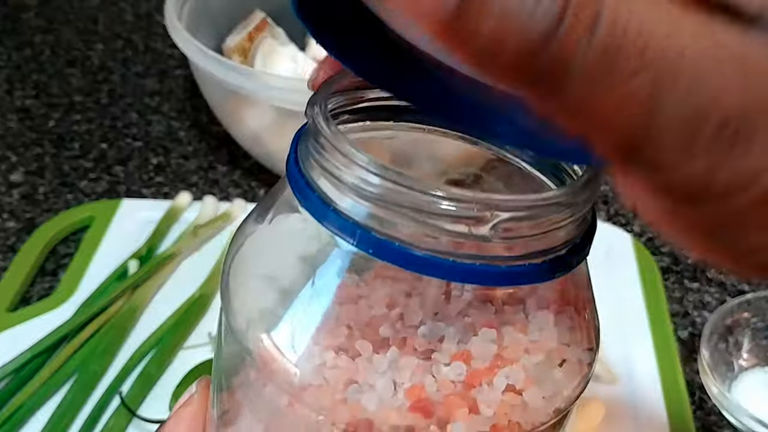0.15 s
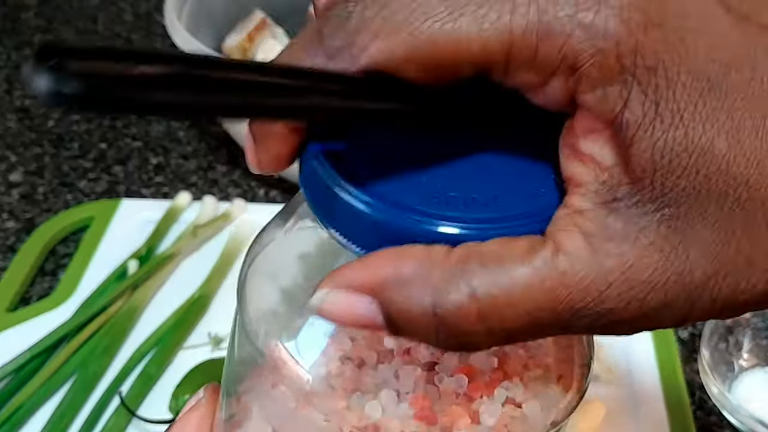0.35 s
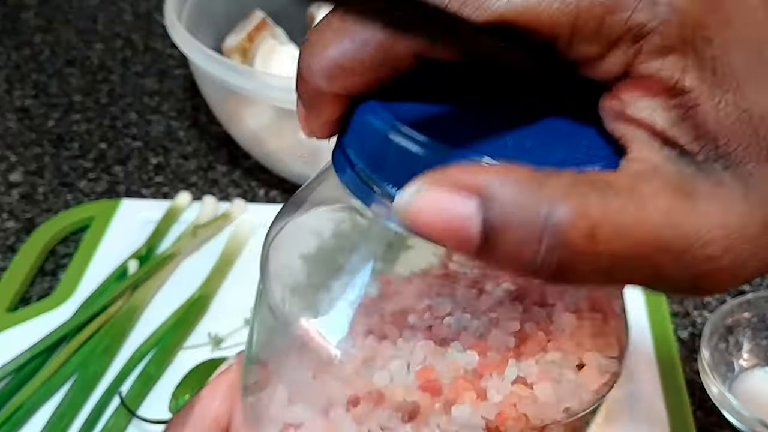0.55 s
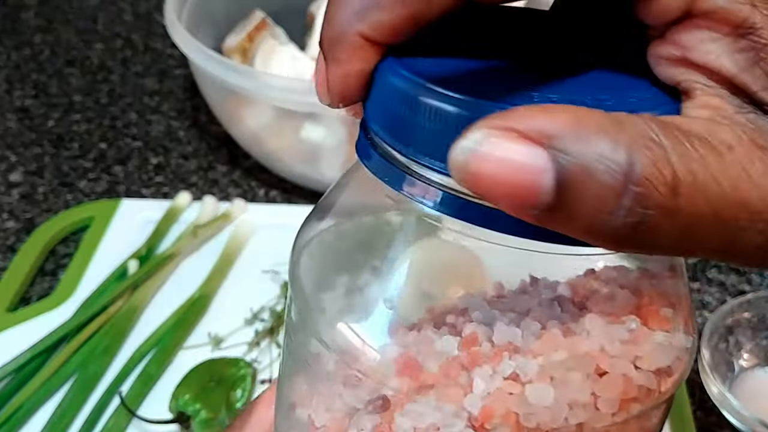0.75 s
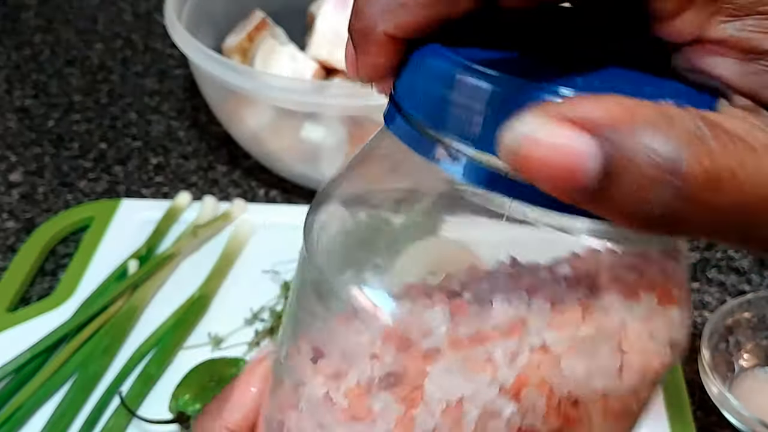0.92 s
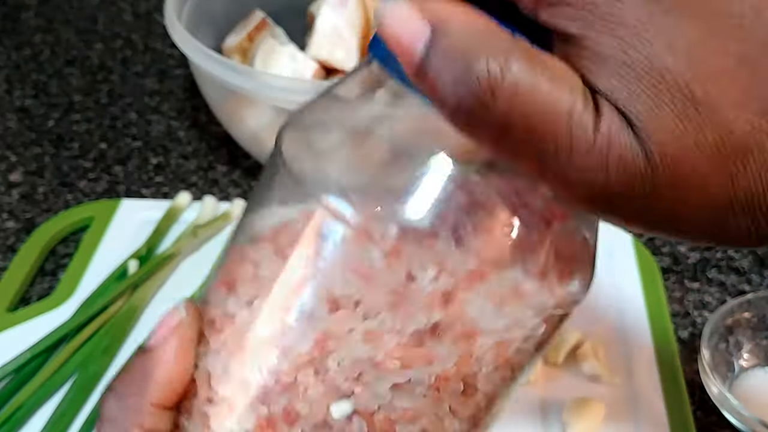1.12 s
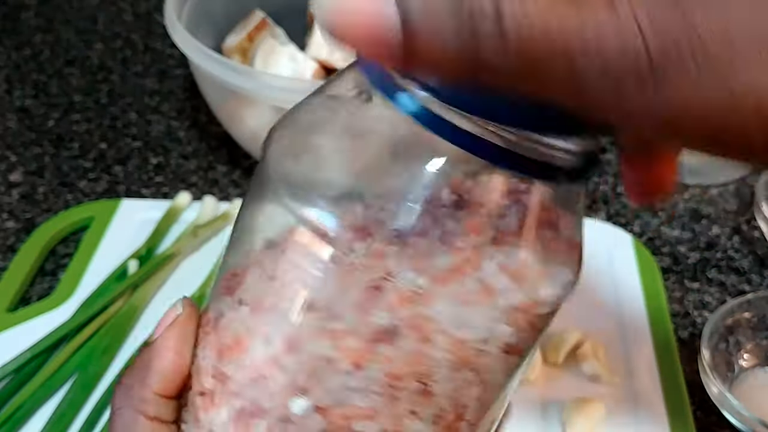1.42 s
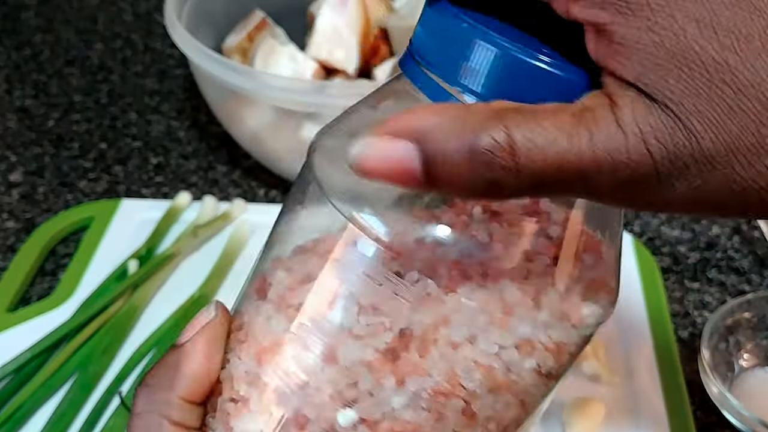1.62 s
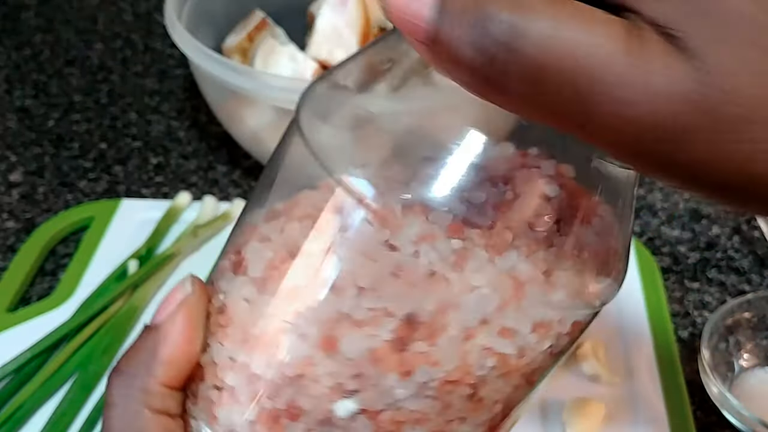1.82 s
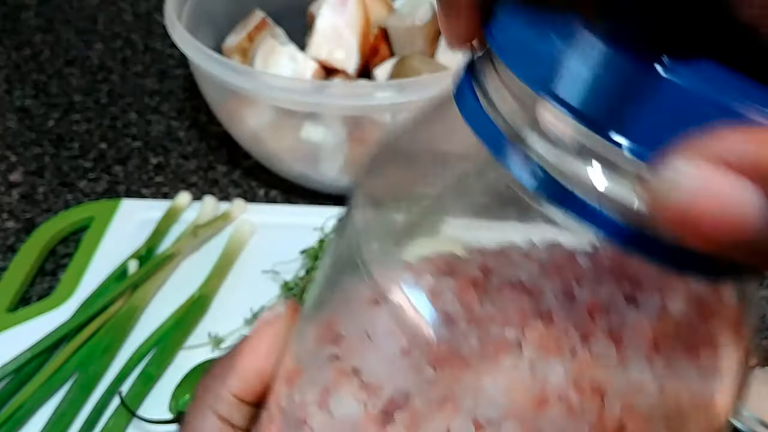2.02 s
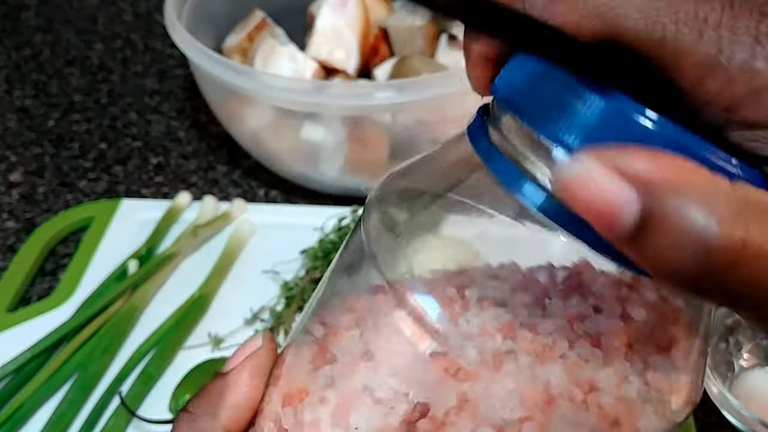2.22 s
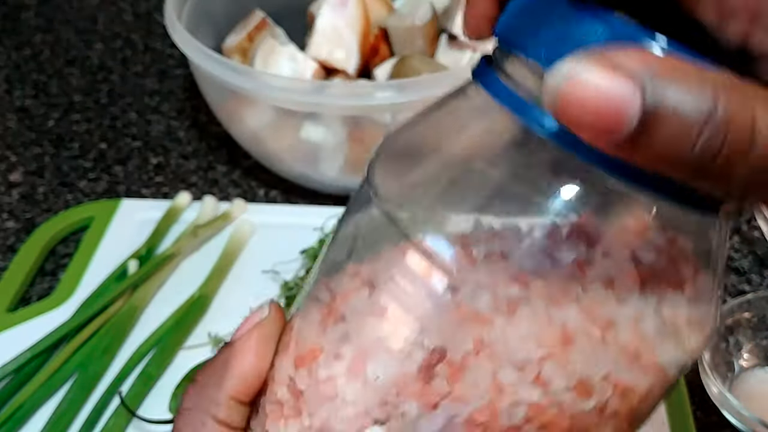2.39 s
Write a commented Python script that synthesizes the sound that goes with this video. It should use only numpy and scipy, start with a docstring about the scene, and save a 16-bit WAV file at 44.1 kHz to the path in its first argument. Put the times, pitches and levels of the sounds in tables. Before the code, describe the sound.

A plastic lid is screwed onto a glass jar of coarse salt. Hollow taps sink in pitch, then the lid knocks and snaps over the thread while crystals slide and rattle, close up in a softly humming kitchen.

```python
"""A plastic lid is screwed onto a glass jar of coarse salt, knocking and snapping over the thread.
As the lid covers the mouth, the air in the jar rings hollow and sinks in pitch.
Crystals slide and rattle as the jar tilts; light contacts clink the glass wall.
The jar is close to the microphone in a small kitchen that hums underneath."""
import sys
import numpy as np
from scipy import signal
from scipy.fft import rfft, irfft, next_fast_len
from scipy.io import wavfile
from scipy.ndimage import map_coordinates

SR = 44100
rng = np.random.default_rng(int(sys.argv[2]) if len(sys.argv) > 2 else 0)


def digitize_waveform(pressure):
    """Quantize a signal to 16-bit integers and store it at the path in sys.argv[1].

    Rows of a 2-D input are taken as channels; values are limited to [-1, 1].
    """
    field = np.atleast_2d(pressure).T
    bounded = np.clip(field, -1, 1)
    quanta = np.round(bounded * 32767).astype(np.int16)
    wavfile.write(sys.argv[1], SR, quanta)


N = 112454


def amp(db):
    """Decibels to gain."""
    return 10 ** (np.asarray(db) / 20)


def unit(x):
    """Scale to rms 1."""
    return x / np.sqrt(np.mean(x ** 2) + 1e-20)


def curve_at(points, hz):
    """Interpolate (f/Hz, value) points on a log axis."""
    point_hz, values = np.transpose(points)
    return np.interp(np.log(hz + 1), np.log(point_hz + 1), values)


def add(track, start_s, x):
    """Mix x into the track."""
    i = max(0, round(start_s * SR))
    track[..., i:i + x.shape[-1]] += x[..., :max(0, track.shape[-1] - i)]


def fade(t, t60_s):
    """Exponential decay."""
    return np.exp(-np.log(1000) * t / t60_s)


def rise(t, tau_s):
    """Exponential attack."""
    return 1 - np.exp(-t / tau_s)


def coloured(x, db_of_hz):
    """Minimum-phase filter with the given gain curve."""
    n = x.shape[-1]
    size = 2 * next_fast_len(n // 2 + 4096)
    cepstrum = irfft(np.log(amp(db_of_hz(np.fft.rfftfreq(size, 1 / SR)))), size)
    cepstrum[..., 1:size // 2] *= 2
    cepstrum[..., size // 2 + 1:] = 0
    return irfft(rfft(x, size) * np.exp(rfft(cepstrum)), size)[..., :n]


def ring(modes, t, scatter_db=2, detune=0.008):
    """Decaying modes; each blow lands elsewhere and weights them anew."""
    out = np.zeros(len(t))
    for k, (hz, db, t60_s) in enumerate(modes):
        db += scatter_db * rng.standard_normal()
        hz *= 1 + detune * rng.standard_normal()
        out += (-1) ** k * amp(db) * fade(t, t60_s) * np.sin(2 * np.pi * hz * t)
    return out


# left-right likeness: f/Hz, correlation
STEREO_CORRELATION = [(40, 0.98), (120, 0.88), (300, 1), (650, 0.45), (1400, 0.095), (3000, 0), (8000, 0)]

def noise(spectrum, size):
    """Stereo noise of rms 1, alike in the bass, unrelated in the treble."""
    hz = np.fft.rfftfreq(size, 1 / SR)
    angle = np.arccos(np.clip(curve_at(STEREO_CORRELATION, hz), -1, 1)) / 2
    shaped = rfft(rng.standard_normal((2, size))) * amp(curve_at(spectrum, hz))
    mid, side = irfft(shaped * [np.cos(angle), np.sin(angle)], size)
    return unit(np.array([mid + side, mid - side]))


# room noise: f/Hz, level/dB
HUM_SPECTRUM = [(20, -35), (35, 8), (60, 0), (90, -4.5), (118, 3), (165, -7.5), (212, 2.5), (260, -8),
                (300, -1.5), (370, -16), (440, -6), (700, -20), (1200, -32), (3000, -40), (8000, -42.5),
                (16000, -39)]

def hum(level_db=-39, waver_db=1.5, wavers_per_s=10):
    """Low, slightly wavering kitchen noise."""
    waver = map_coordinates(rng.standard_normal(64), [np.arange(N) / SR * wavers_per_s])
    return amp(level_db + waver_db * waver) * noise(HUM_SPECTRUM, N)


# room decay: f/Hz, t60/s
REVERB_DECAY = [(100, 0.28), (300, 0.19), (700, 0.27), (2000, 0.25), (5000, 0.23), (8000, 0.19),
                (15000, 0.19)]
# reverb colour: f/Hz, level/dB
REVERB_EQ = [(60, -5), (300, -6), (700, -4), (2000, -5), (8000, -4.5), (16000, -2)]

def kitchen_reverb(x, onset_s=0.0017):
    """Short, bright kitchen reverberation, with a fresh random tail every 0.2 s."""
    out, size, block = np.zeros((2, N)), SR // 2, SR // 5
    onset = 1 - np.exp(-(np.arange(size) / SR / onset_s) ** 2)
    for i in range(0, N, block):
        white = noise([(20, 0), (20000, 0)], size)
        hz, t, bands = signal.stft(white, SR, nperseg=256)
        bands *= fade(t, curve_at(REVERB_DECAY, hz)[:, None])
        tail = signal.istft(bands, SR, nperseg=256)[1][:, :size]
        tail = unit(tail * onset) / np.sqrt(size)
        add(out, i / SR, signal.fftconvolve(x[:, i:i + block], tail, axes=1))
    return coloured(out, lambda hz: curve_at(REVERB_EQ, hz))


# crystal slides: t/s, length/s, level/dB, median f/Hz
SALT_SLIDES = [(.001, 0.025, -38.5, 11950), (.004, 0.0069, -38, 3040), (0.011, 0.033, -49, 4900),
               (0.066, 0.0027, -42.5, 5140), (0.102, 0.032, -52, 5530), (0.134, 0.042, -44.5, 4860),
               (0.339, .012, -40, 3100), (0.517, 0.089, -58.5, 6070), (0.572, 0.075, -47, 5340),
               (0.668, 0.0058, -35.5, 6600), (0.686, .04, -48.5, 5700), (0.729, 0.041, -38.5, 5500),
               (0.793, 0.066, -59, 5580), (0.833, 0.027, -34.5, 6020), (.89, 0.086, -47, 5880),
               (0.971, 0.054, -38.5, 4630), (1.037, 0.068, -33, 4820), (1.116, 0.054, -40.5, 4720),
               (1.159, .005, -35, 4800), (1.21, .09, -49, 4500), (1.335, 0.17, -44.5, 4280),
               (1.394, 0.0046, -31, 1700), (1.424, 0.021, -37, 1614), (1.449, 0.011, -36.5, 6440),
               (1.475, 0.0033, -28, 5560), (1.49, 0.07, -44.5, 2600), (1.5, 0.025, -26, 8850),
               (1.505, .003, -23.5, 6380), (1.516, 0.0033, -26.5, 6400), (1.53, .003, -29, 5900),
               (1.533, 0.0081, -26, 5800), (1.544, .045, -40.5, 5200), (1.6, .005, -37, 5960),
               (1.609, 0.086, -63, 2000), (1.694, 0.014, -45, 2400), (1.842, 0.0099, -42.5, 5400),
               (1.996, 0.024, -22, 6630), (2.022, 0.039, -37.5, 5400), (2.321, 0.044, -61, 6500),
               (2.475, .035, -36, 3790), (2.515, 0.021, -47, 4500)]
# rattle colour: f/Hz, level/dB
SALT_EQ = [(300, -11), (1500, -2), (3000, -0.5), (5500, 4), (8000, 3), (12000, 4), (16000, 5)]

def salt(grains_per_s=5500, log_pitch_spread=0.386, decay_cycles=2.9, settle_s=0.004):
    """Each slide is a shower of tiny crystal collisions, each at its own pitch."""
    out, t, size = np.zeros((2, N)), np.arange(SR // 200) / SR, SR // 4
    for start_s, length_s, db, median_hz in SALT_SLIDES:
        count = int(grains_per_s * length_s) + 4
        hit_s = rng.uniform(0, length_s, count) + rng.exponential(settle_s, count)
        hz = median_hz * np.exp(log_pitch_spread * rng.standard_normal((count, 1)))
        hz = np.clip(hz, 300, SR / 3)
        phases = rng.uniform(0, 2 * np.pi, (2, count, 1))
        grains = np.exp(-hz * t / decay_cycles) * np.sin(2 * np.pi * hz * t + phases)
        indices = ((hit_s * SR).astype(int)[:, None] + np.arange(len(t))).ravel()
        shower = np.array([np.bincount(indices, channel.ravel(), size)[:size] for channel in grains])
        duty = (length_s + settle_s) * SR / size
        add(out, start_s, amp(db) * unit(shower) * np.sqrt(duty))
    return coloured(out, lambda hz: curve_at(SALT_EQ, hz))


# glass contacts: t/s, level/dB
GLASS_CLINKS = [(1.275, -20.5), (1.334, -35), (1.345, -28.5), (1.373, -45), (1.397, -48.5), (1.432, -43)]
# glass wall: f/Hz, level/dB, t60/s
GLASS_MODES = [(2103, -5, 0.029), (2310, -3, 0.057), (2400, 2.5, 0.019), (3000, -11, 0.022),
               (4700, -8, 0.021)]
# hard contact, on glass or thread: f/Hz, level/dB
CRACK_SPECTRUM = [(500, -44), (2000, 0), (3500, 5), (5500, 3.5), (8000, -1), (16000, -7.5)]

def glass_clinks():
    """Light, hard contacts tick and ring the glass wall."""
    out, t = np.zeros((2, N)), np.arange(SR // 4) / SR
    for start_s, db in GLASS_CLINKS:
        tick = amp(-7.5) * noise(CRACK_SPECTRUM, len(t)) * fade(t, t60_s=0.01)
        wall = ring(GLASS_MODES, t) * rise(t, tau_s=0.00049)
        add(out, start_s, amp(db) * (wall + tick))
    return out


# lid pushes on the rim: t/s, level/dB, air t60/s, relative tick level/dB
RIM_TOUCHES = [(.136, -15, 0.048, -14), (.149, -19.5, 0.025, -14.5), (0.168, -30.5, 0.14, -15),
               (0.256, -15.5, 0.052, -19.5), (.279, -23.5, 0.21, -38), (.29, -25, 0.11, -31),
               (0.311, -15, 0.081, -27), (0.354, -8, 0.018, -23.5), (0.59, -19.5, 0.033, -27),
               (0.852, -17.5, 0.035, -25), (1.026, -22, .04, -36), (1.858, -11.5, .12, -12),
               (1.986, -14.5, .1, -25)]
# rim tick: f/Hz, level/dB
TICK_SPECTRUM = [(200, -13), (600, 4), (1200, 9), (2000, -2), (3200, 4), (4500, -8), (8000, -13.5),
                 (16000, -23)]
# air resonance: t/s, f/Hz
AIR_PITCH = [(0.138, 430), (0.202, 398.8), (.26, 342.4), (.3, 339), (.32, 291), (.345, 272.7), (.37, 305),
             (0.598, 280), (.85, 320), (1.799, 334)]

def jar_air():
    """The lid ticks on the rim and rings the air in the jar, lower as the gap closes."""
    envelope, ticks, t = np.zeros(N), np.zeros((2, N)), np.arange(SR // 4) / SR
    for start_s, db, t60_s, tick_db in RIM_TOUCHES:
        add(envelope, start_s, amp(db) * fade(t, t60_s) * rise(t, tau_s=0.0012))
        add(ticks, start_s, amp(db + tick_db) * noise(TICK_SPECTRUM, len(t)) * fade(t, t60_s=0.015))
    hz = np.interp(np.arange(N) / SR, *np.transpose(AIR_PITCH))
    return envelope * np.sin(2 * np.pi * np.cumsum(hz) / SR) + ticks


# knocks and thread snaps: t/s, level/dB, contact cut-off f/Hz, thump trim/dB, clack trim/dB,
# crack trim/dB
LID_KNOCKS = [(.098, -29, 594, -16, -28, -7.5), (.305, -18, 500, -27, -21, -17),
              (.313, -15, 506, -14.5, -18, -17.5), (.353, -19, 594, -12, -11, -4),
              (.360, -14, 595, -23, -31, -16), (.593, -16, 397, -19.5, -23.5, -34),
              (.849, -5.5, 430, -22, -24, -22), (1.0247, -2.5, 1190, -23.5, -11.5, -10.5),
              (1.032, -14.5, 910, -18, -23, -5.5), (1.062, -9.5, 900, -32, -10, -9.5),
              (1.171, -17.5, 910, -28, -12.5, -33), (1.182, -11, 617, -25, -15, -11),
              (1.186, -14.5, 497, -10.5, -14.5, -12.5), (1.331, -13.5, 740, -38, -17, -20.5),
              (1.350, -19, 770, -23, -20.5, -26.5), (1.372, -17, 1100, -1, -11, -22),
              (1.737, -11.5, 394.9, -11.5, -17, -29), (1.854, -10, 297, 0.5, -24, -32),
              (1.8576, -8, 400, -18, -7.5, -5), (1.860, -10, 800, -12, -7, -8.5),
              (1.984, 0.5, 660, -43, -16.5, -21.5), (1.988, -2, 1100, -30, -10, -13),
              (1.994, -6, 960, -20, -26, -8), (2.010, -11, 800, -36, -17.5, -14),
              (2.086, -11.5, 600, -27, -15.5, -14), (2.103, -21, 605, -2, -16, -12.5),
              (2.1667, -4, 1080, -31.5, -15, -22), (2.174, -16.5, 400, -12.5, -29, -26),
              (2.399, -24.5, 790, -13, -21.5, -46)]
# closed jar: f/Hz, level/dB, t60/s
JAR_MODES = [(174, -25, .06), (243.6, -6.5, 0.074), (319, -9.5, 0.059), (333.4, -6, 0.15),
             (434, -2.5, 0.042), (499, -6, 0.065), (599.6, -10.5, 0.077), (717, -6.5, 0.059),
             (896, -10, 0.027), (1050, -19.5, 0.014)]
# plastic lid: f/Hz, level/dB, t60/s
LID_MODES = [(1044, -6.5, 0.046), (1206, -13, 0.027), (1430, -14.5, 0.049), (1559, -5.5, 0.029),
             (1788, -9, 0.053), (2124, -10, 0.065), (2340, -11.5, 0.025), (2460, -11.5, 0.041),
             (2640, -14, 0.085), (3200, -27, .04)]
# lid impact noise: f/Hz, level/dB
CLACK_SPECTRUM = [(200, -19), (500, 1), (1000, 7.5), (1400, -3), (2400, 3), (3500, -6.5), (6000, -65.5),
                  (16000, -39)]

def lid_knocks(push_s=0.00056, thump_hz=107):
    """Each slip pushes the air, thumps the held jar, rings jar and lid and cracks on the thread."""
    out, t = np.zeros((2, N)), np.arange(SR // 4) / SR
    u = t / push_s
    push = amp(-3) * np.e * u * (2 - u) * np.exp(-u)
    thump = amp(0.5) * fade(t, t60_s=0.064) * np.sin(2 * np.pi * thump_hz * t)
    for start_s, db, contact_hz, thump_db, clack_db, crack_db in LID_KNOCKS:
        contact_lowpass = signal.butter(2, contact_hz, fs=SR)  # lower = softer
        body = signal.lfilter(*contact_lowpass, amp(-10) * ring(JAR_MODES, t) + push)
        clack = amp(-1.5) * ring(LID_MODES, t)
        clack = clack + amp(6) * noise(CLACK_SPECTRUM, len(t)) * fade(t, t60_s=0.015)
        crack = amp(5) * noise(CRACK_SPECTRUM, len(t)) * fade(t, t60_s=0.033) * rise(t, tau_s=0.00064)
        knock = body + amp(thump_db) * thump + amp(clack_db) * clack + amp(crack_db) * crack
        add(out, start_s, -amp(db) * knock)
    return out


def scene():
    """Lid, jar and salt in the kitchen."""
    jar = lid_knocks() + jar_air() + glass_clinks() + amp(-2.5) * salt()
    return jar + kitchen_reverb(jar) + hum()


# microphone response: f/Hz, level/dB
MIC_EQ = [(20, -30), (38, -23.5), (60, -10), (100, -1), (1000, 0), (4000, -0.5), (6800, -0.5), (7450, 4.5),
          (7750, 9), (8000, 6.5), (8600, 1.5), (9400, -9.5), (10600, -27.5), (12300, -13), (16000, -15)]
# left over right: f/Hz, level/dB
MIC_BALANCE = [(100, 4), (350, 2.3), (700, 1), (1300, 3.5), (2400, 1), (5500, 2), (7800, 6), (9500, 6.5),
               (15000, -1.5)]

def record(dry, top_hz=16000):
    """Two microphone ports: treble peak with a notch above it, soft overload, band limit."""
    sides = np.array([[0.5], [-0.5]])
    x = coloured(dry, lambda hz: curve_at(MIC_EQ, hz) + sides * curve_at(MIC_BALANCE, hz))
    clipped = x / (1 + np.abs(x) ** 6) ** (1 / 6)
    size = next_fast_len(N + SR // 4)
    passband = np.fft.rfftfreq(size, 1 / SR) < top_hz
    return irfft(rfft(clipped, size) * passband, size)[:, :N]


dry = scene()
out = record(dry)
digitize_waveform(out)
```